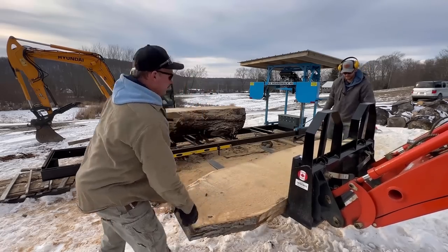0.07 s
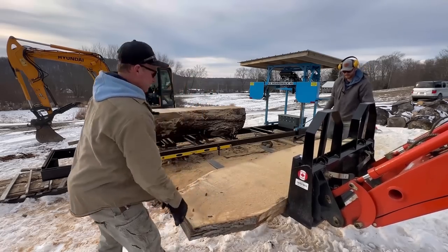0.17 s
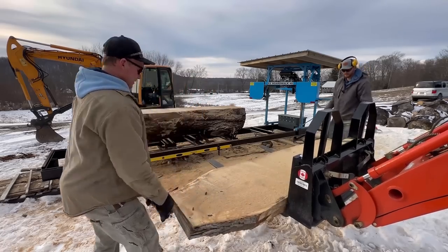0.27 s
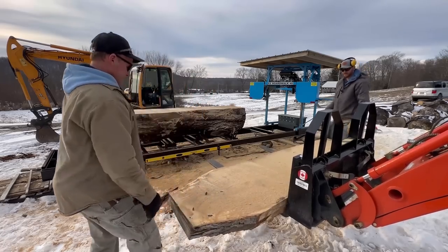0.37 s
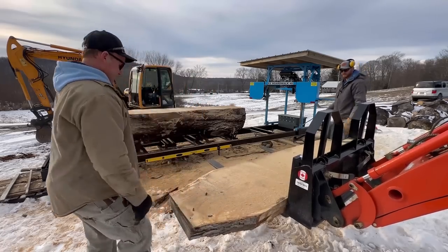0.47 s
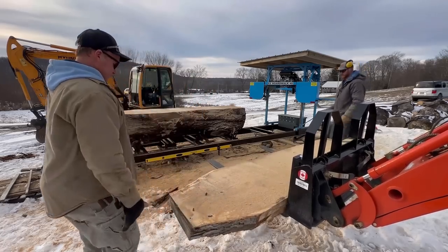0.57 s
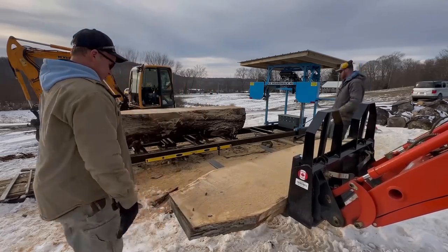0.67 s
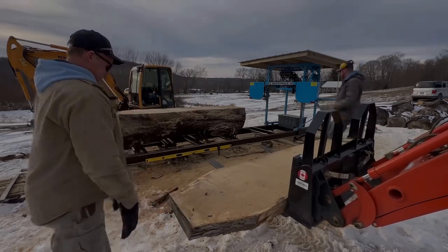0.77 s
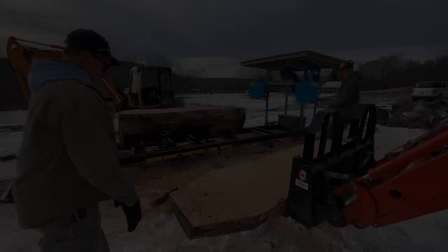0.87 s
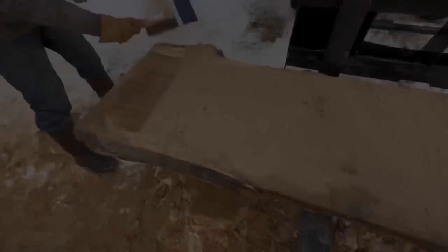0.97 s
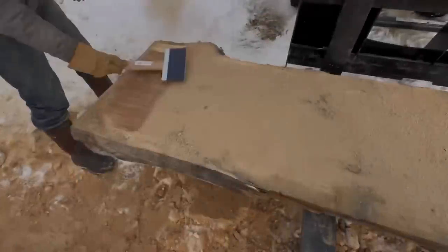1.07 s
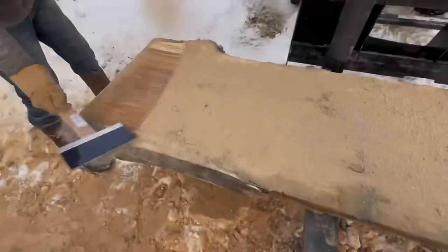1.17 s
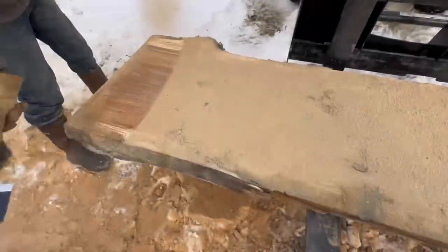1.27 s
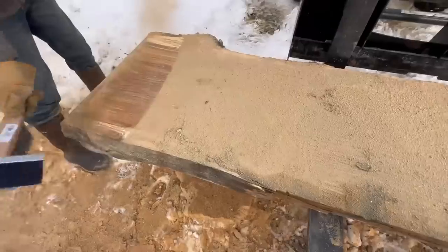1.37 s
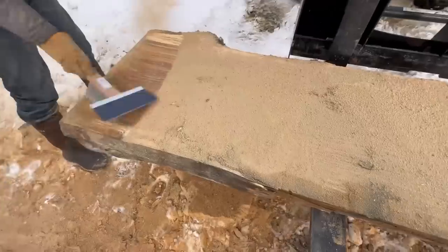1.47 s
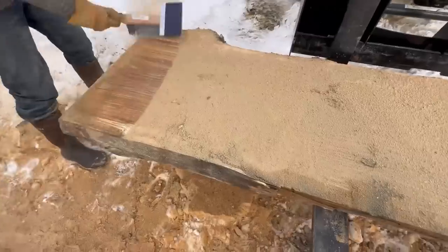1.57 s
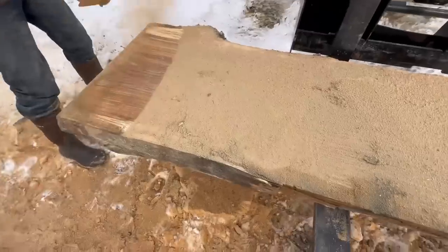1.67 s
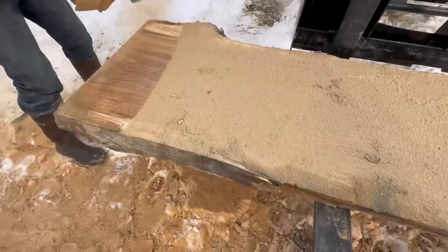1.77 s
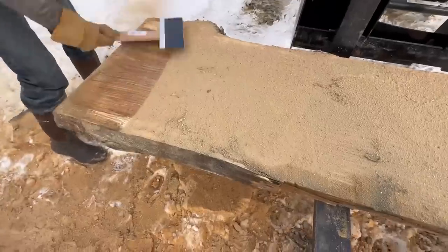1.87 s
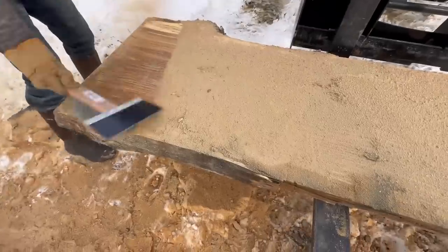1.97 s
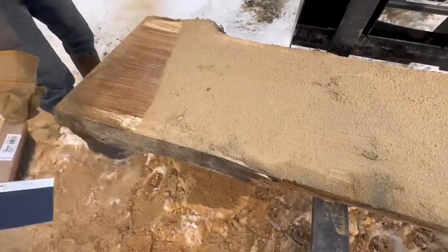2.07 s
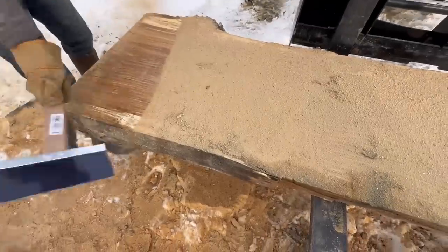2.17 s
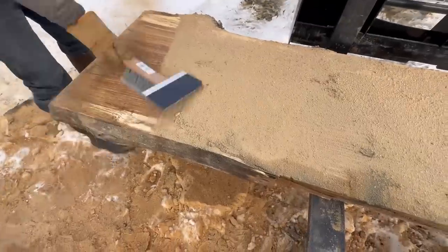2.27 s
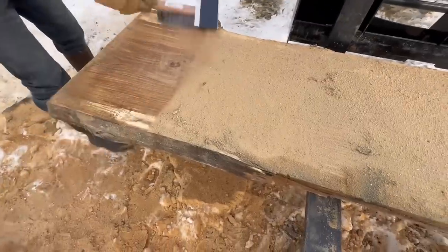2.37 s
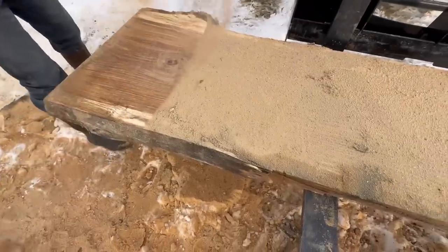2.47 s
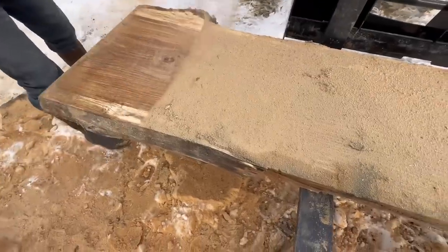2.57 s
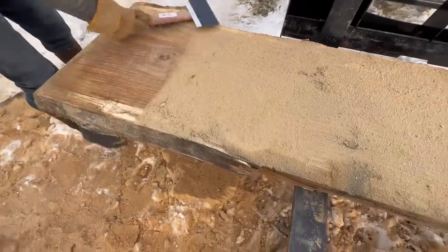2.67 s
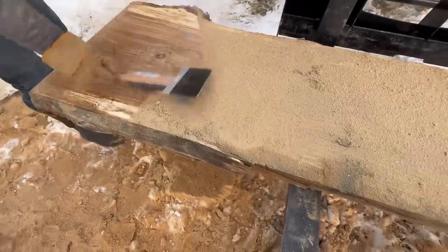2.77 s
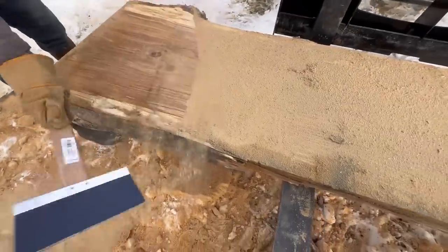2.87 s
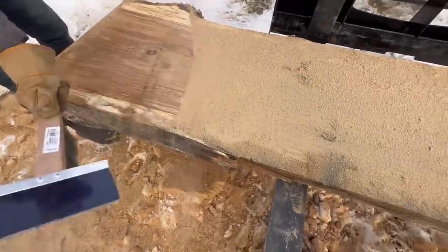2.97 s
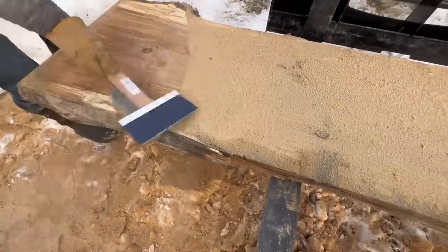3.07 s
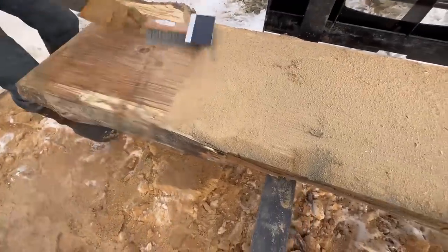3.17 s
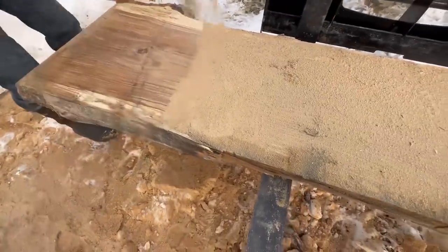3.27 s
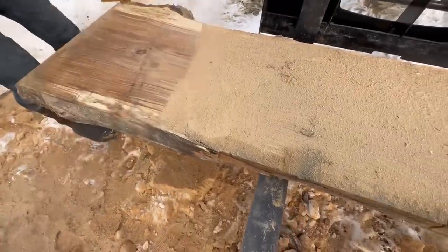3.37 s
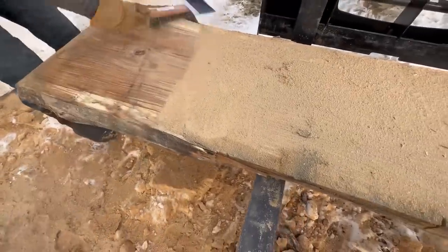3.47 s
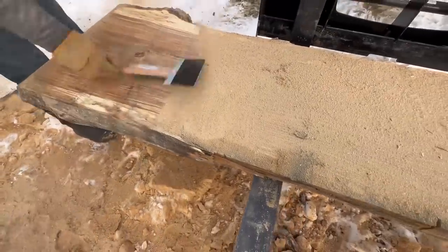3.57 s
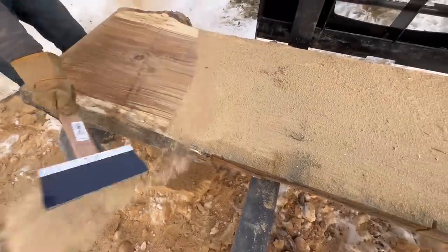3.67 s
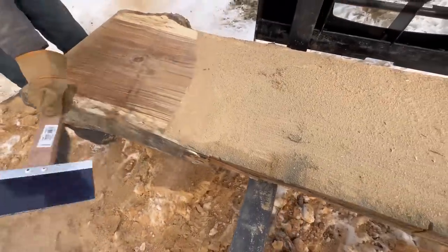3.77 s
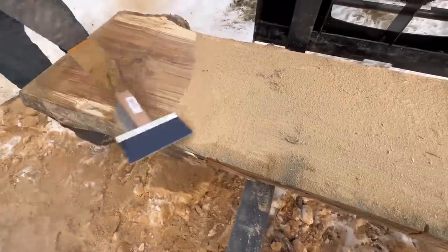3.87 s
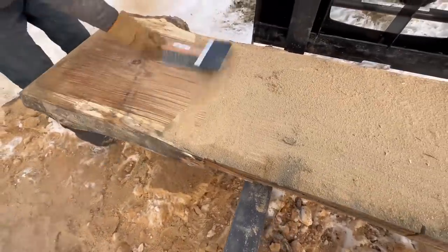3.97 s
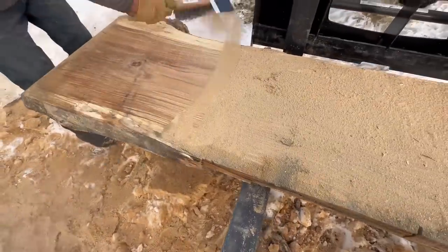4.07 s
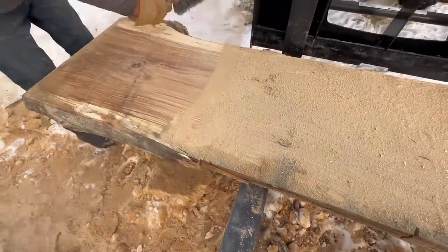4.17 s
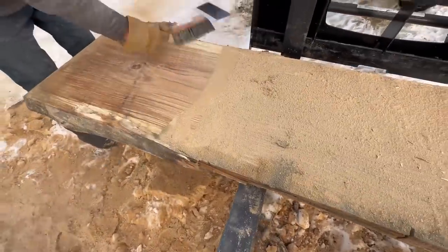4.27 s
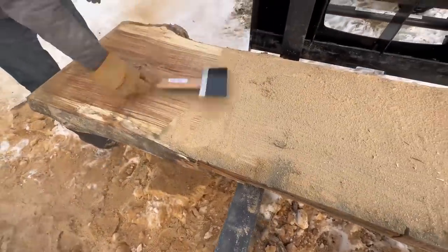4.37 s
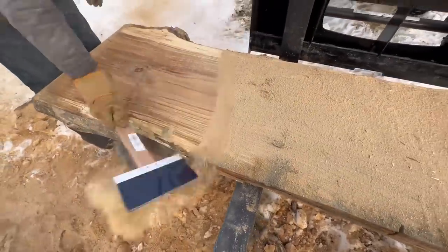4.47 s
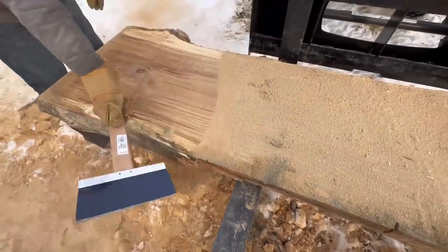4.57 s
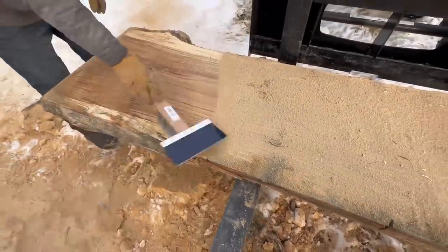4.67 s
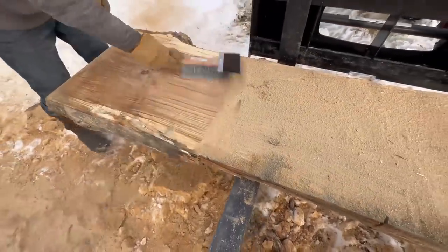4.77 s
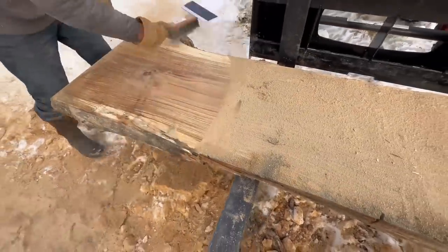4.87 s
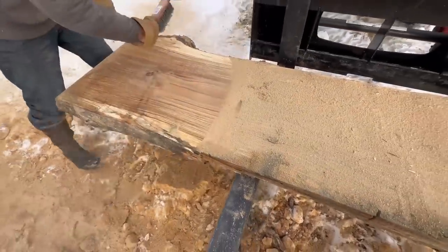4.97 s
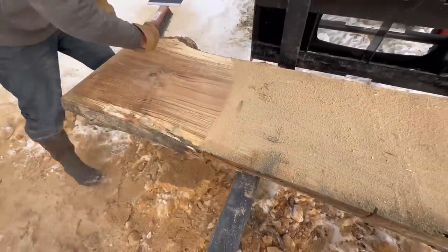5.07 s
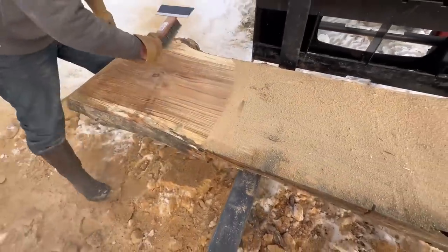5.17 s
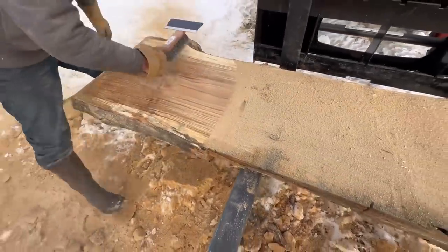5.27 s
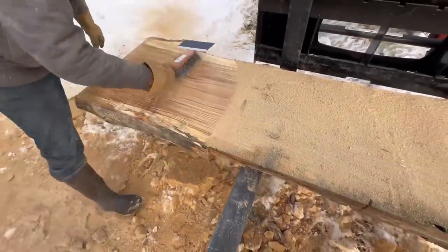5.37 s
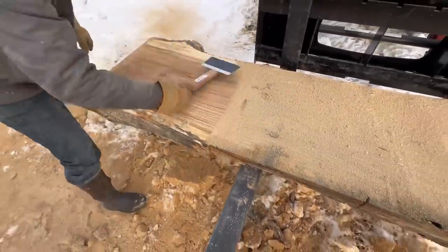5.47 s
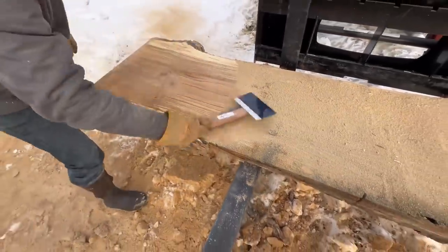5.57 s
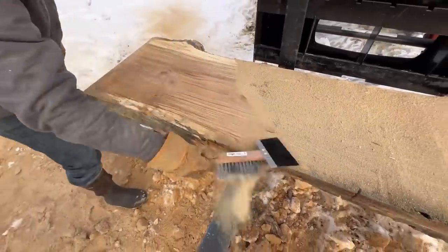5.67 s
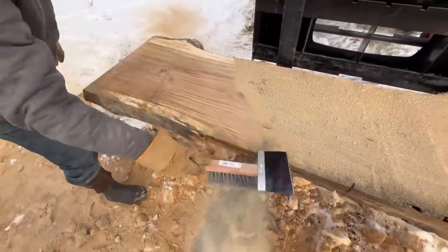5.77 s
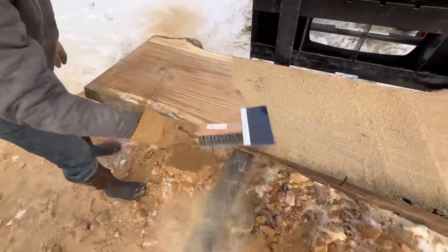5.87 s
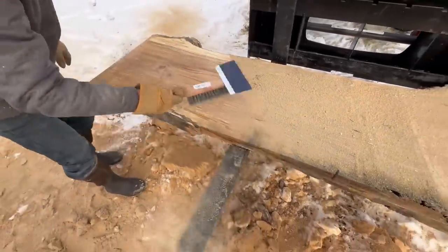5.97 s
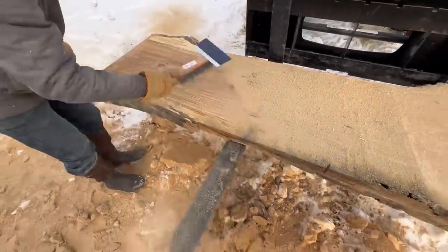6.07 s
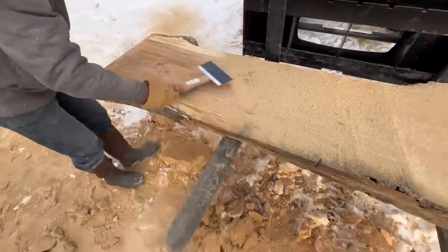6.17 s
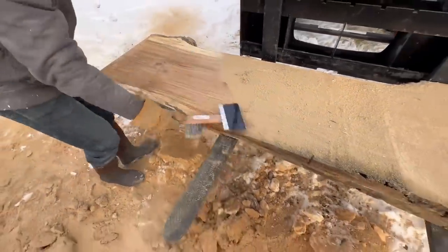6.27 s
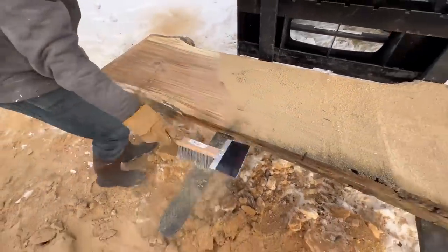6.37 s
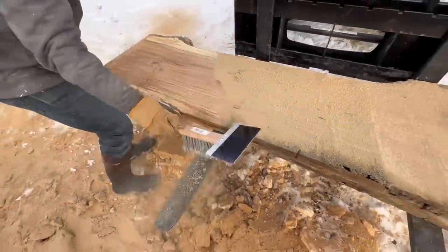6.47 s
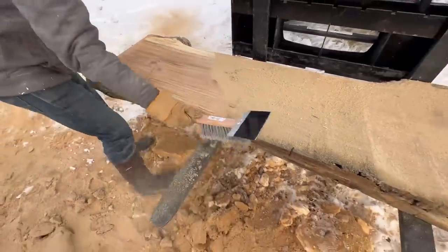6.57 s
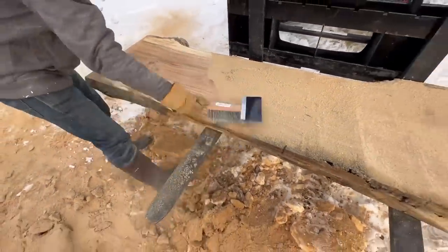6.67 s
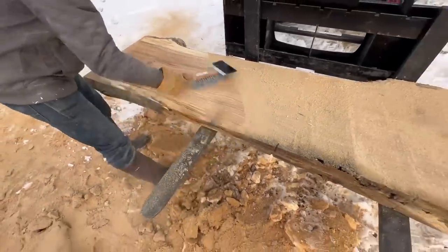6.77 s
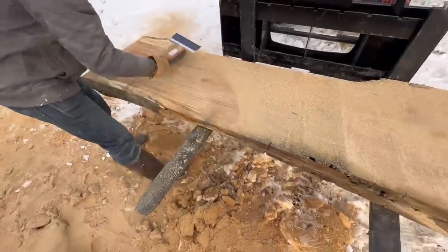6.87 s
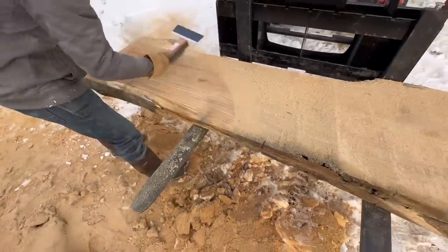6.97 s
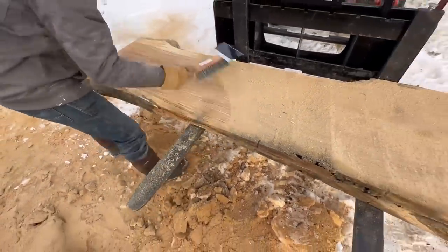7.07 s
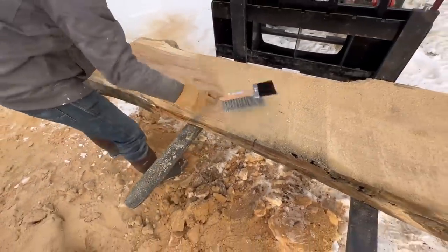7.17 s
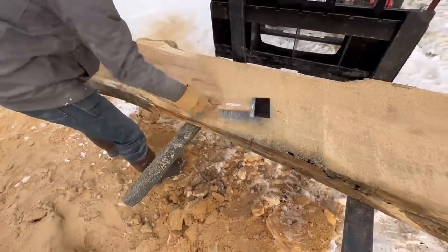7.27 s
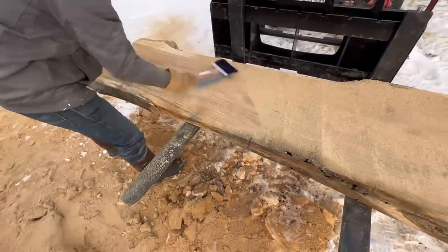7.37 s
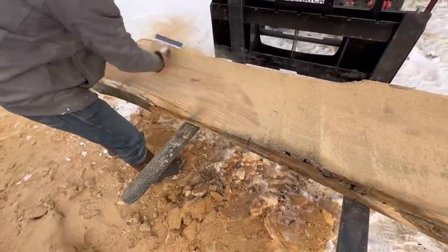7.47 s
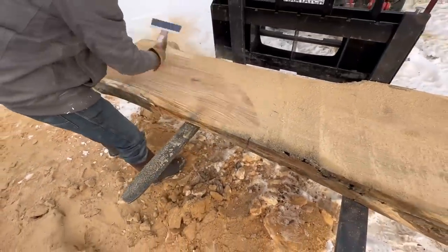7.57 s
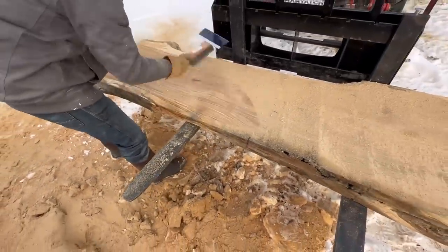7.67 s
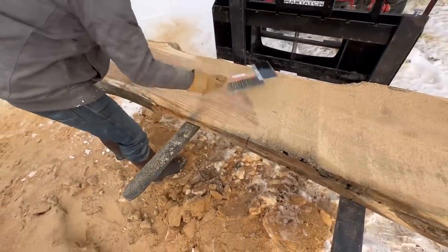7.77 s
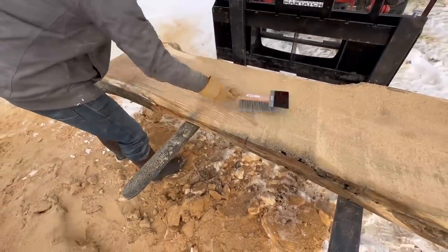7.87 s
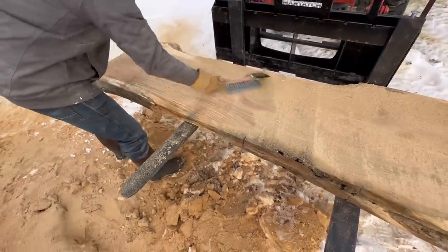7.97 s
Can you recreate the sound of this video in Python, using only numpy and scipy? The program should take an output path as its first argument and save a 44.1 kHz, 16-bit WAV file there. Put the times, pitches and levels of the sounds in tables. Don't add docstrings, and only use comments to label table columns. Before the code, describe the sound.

Outdoors, a loud slab impact and engine idle fade out, followed by brisk bristle strokes, soft woody thumps, metallic scraper clinks and wind rumble.

```python
import sys
import numpy as np
from scipy import signal
from scipy.fft import rfft, irfft
from scipy.io import wavfile
from scipy.ndimage import uniform_filter1d

SR = 44100
rng = np.random.default_rng(int(sys.argv[2]) if len(sys.argv) > 2 else 0)


def transcribe(u):
    v = np.clip(np.atleast_2d(u).T, -1, 1)
    q = np.round(v * 32767).astype(np.int16)
    wavfile.write(sys.argv[1], SR, q)


def ratio(d):
    e = np.asarray(d, float) / 20
    return 10 ** e


N = 353858
RING = SR // 4

FADE_OUT_S, SILENCE_S, FADE_IN_S = 0.54, 0.921, 1.42

# (frequency [Hz], level [dB])
ROAR_COLOUR = [(50, -18), (120, -7.5), (500, -8.5), (1000, -11), (2500, -20.5), (4100, -30), (6000, -23.5),
               (8600, -26.5), (9400, -34.5), (15500, -34)]
# (time [s], level [dB])
LOADER_LEVEL = [
    (0.0, -51.5),
    (0.594, -57),
    (0.93, -70.5),
]
# (frequency [Hz], width [Hz], level [dB])
HOUSING = [(2180, 200, -19), (3520, 320, -11.5)]
# (time [s], frequency [Hz], level [dB])
TURBO_PATH = [(0, 14600, -25), (.2, 14100, -23), (.34, 13900, -18), (.42, 13000, -17), (.46, 12900, -18),
              (.5, 12200, -30), (.58, 11800, -28), (.7, 12450, -23)]
# (frequency [Hz], level [dB])
PUMP_TONES = [(301.5, -5), (412, -3), (444, -5.5)]
# (time [s], pump hum [dB], valve hiss [dB], fan whine [dB])
ENGINE_LOAD = [(0, 6, -29, -10), (.2, 4.5, -22, -14), (.45, 3, -13, -14), (.6, -4, -8.5, -19),
               (.9, 3, -3, -17)]

# (frequency [Hz], level [dB per Hz])
WIND_COLOUR = [(8.8, -21), (15, -7), (38, 0), (135, -4.5), (216, -16.5), (326, -14.5), (400, -22),
               (520, -58), (880, -120)]
# (time [s], level [dB])
GUST_PEAKS = [(0.16, -52), (1.47, -50.5), (1.66, -51), (2.4, -47), (2.7, -55), (3.08, -58), (3.2, -47.5),
              (3.9, -53), (4.15, -53.5), (4.75, -47), (5.12, -48), (5.3, -49.5), (5.5, -38.5), (5.9, -49.5),
              (6.28, -43), (6.52, -49.5), (6.9, -48.5), (7.08, -51), (7.5, -52)]
BREEZE_DB, GUST_RISE_DB_PER_S, GUST_FALL_DB_PER_S = -62.5, 75, 70

# (time [s], peak [dB])
SLAB_LANDINGS = [
    (0.1218, -12.5),
    (0.1386, -23.5),
    (0.172, -30.5),
]
# (frequency [Hz], level [dB], time to fall 60 dB [s])
FORK_MODES = [(106, -13, 0.22), (156, -6.5, 0.22), (225.7, -0.5, 0.2), (282.5, 5, 0.14), (330, 5.5, 0.12),
              (400, -9, 0.082), (517, -6.5, 0.066), (644, -4, 0.042), (916, -17, .04)]

# (time [s], peak [dB], centre [Hz], fall [dB per 20 ms], brightness [dB])
SLAB_THUMPS = [(0.633, -42, 263, 7, -21), (1.359, -29, 254, 5.5, -4.5), (1.783, -26.5, 249, 5, -3.5),
               (2.242, -35, 242, 6, -3), (2.383, -44.5, 242, 15, -8), (2.714, -27, 288, 7.5, -11),
               (3.083, -30.5, 263, 6, -4), (3.166, -38.5, 246, 3, 1), (3.527, -33, 316, 5.5, -9),
               (3.92, -32.5, 318, 7, -7.5), (4.322, -26, 324, 6, -11), (4.708, -25, 331, 8.5, -6.5),
               (5.09, -28, 346, 5, -9.5), (5.481, -38, 203, 9, -2), (5.556, -40, 375, 6, -3),
               (6.137, -44, 260, 9, -16), (6.275, -49, 300, 26, -10), (6.487, -39, 234, 6, -15),
               (6.682, -41, 222, 3.5, -5), (7.69, -43.5, 277, 5.5, -6)]
# (frequency [Hz], level [dB])
SLAB_MODES = [(140, 4.5), (163, -2.5), (221, 0.5), (262, 0), (285, 0.5), (328, 7.5), (372, -3.5), (410, -2),
              (480, -2), (520, 3.5), (640, -5.5), (720, -14), (870, -11), (1050, -15)]
PAD_CYCLES, PAD_DB, REBOUND_S, REBOUND_DB = 1.96, 3.5, 0.01113, -5

# (time [s], peak [dB], length [ms], knock [dB])
TUFT_TICKS = [(0.691, -51, 7.3, -51), (1.121, -62, 2.1, -50.5), (1.4332, -43.5, 9, -45),
              (1.9325, -44, 4.2, -39), (2.1908, -59, 11, -48), (2.3162, -41.5, 4.9, -52),
              (2.7174, -56, 7.5, -38), (3.0627, -54, 1.7, -39), (3.1527, -59, 3.2, -44),
              (3.5442, -62, 2.3, -37), (3.784, -46, 2.1, -47), (4.3651, -64, 3.1, -39.5),
              (4.759, -53, 4.2, -45), (5.456, -50, 4.9, -36.5), (5.4886, -58, 4.4, -39.5),
              (5.8094, -64, 2.6, -68), (5.852, -61, 5.4, -41.5), (6.219, -58, 7.2, -42),
              (6.241, -43, 3.4, -35), (6.261, -54, 3.3, -37.5), (6.311, -60, 2.2, -53),
              (6.326, -60, 3.3, -46), (6.758, -64, 5.2, -43), (7.028, -53, 1.4, -43.5),
              (7.061, -65, 3.6, -51), (7.339, -53, 4, -44.5), (7.753, -64, 2.1, -45.5),
              (7.918, -67, 2.1, -45), (7.966, -49, 4.5, -48)]

# (frequency [Hz], level [dB per Hz])
YARD_COLOUR = [(59, -10.5), (100, -13), (519, -16.5), (774, -16.5), (1160, -23.5), (1550, -28.5),
               (2320, -33), (2930, -34.5), (4370, -35.5), (15500, -40.5)]
# (time [s], level [dB])
YARD_LEVEL = [(1.0, -60.5), (1.5, -58.5), (2.35, -59), (3.7, -61.5), (5.1, -63), (5.67, -57.5),
              (5.9, -60.5), (7.26, -63), (8.02, -59.5)]

# (landing [s], speeding up [ms], time down [ms], hiss [dB], landing below it [dB])
PRESSED_STROKES = [(1.124, 100, 150, -52, 10), (1.543, 240, 130, -44, 14), (1.938, 117, 149, -48.5, 3.5),
                   (2.318, 126, 180, -50, 4.5), (2.726, 124, 194, -48.5, 4), (3.162, 114, 172, -49, 5.5),
                   (3.554, 160, 176, -48, 4), (3.964, 166, 162, -50, 4), (4.371, 76, 175, -45, 8.5),
                   (4.763, 110, 147, -47, 12.5), (5.455, 180, 366, -48, 7), (6.238, 85, 196, -47.5, 10.5),
                   (6.759, 200, 175, -51, 8.5), (7.343, 128, 200, -47, 13)]
# (landing [s], speeding up [ms], time down [ms], hiss [dB], landing below it [dB])
LIGHT_DRAGS = [(1.289, 170, 194, -63, 6.2), (1.84, 80, 70, -67.5, 6), (2.13, 56, 74, -63.5, 12),
               (2.23, 76, 91, -71, 3), (2.51, 18, 65, -63, 0.33), (2.6, 100, 130, -69, 6.3),
               (2.93, 10, 12, -68, 1), (3.08, 70, 84, -68, 8), (3.35, 270, 250, -67, 1.4),
               (4.15, 30, 280, -66, 0.33), (5.098, 200, 180, -73, 8), (5.29, 46, 160, -61, 5.3),
               (5.86, 46, 104, -65.5, 2.9), (6.55, 20, 280, -74, 4.3), (7.0, 36, 335, -79, 2),
               (7.64, 210, 290, -59.5, 10.7), (7.951, 61, 120, -61, 11), (3.745, 7.3, 9.4, -64, 4)]
# (frequency [Hz], level [dB per Hz])
BRISTLE_COLOUR = [(300, -71), (520, -20.5), (1030, -2), (1670, -13.5), (2900, -11), (4200, -11.5),
                  (5700, -6), (6950, -0.5), (8300, -6), (9400, -17), (10700, -13), (11600, -15.5),
                  (13600, -7.5), (15600, -10)]
LAND_S, SLOWING_DB_PER_S, LIFT_S = 0.018, 69, 0.017
TOUCH_DB = -21
DUST_DB, SETTLE_DB_PER_S = -16, 250
TIPS_DB, FLICK_DB, FLICK_S = -1.5, 3, 0.034

# (frequency [Hz], width [Hz], level [dB])
BLADE_BANDS = [(4640, 130, 0.5), (10700, 220, 1), (13900, 300, 3)]
# (start [s], end [s], low band [dB], middle band [dB], high band [dB])
BLADE_TRAILS = [(1.282, 1.53, -78, -78, -73), (3.108, 3.22, -90, -68, -84), (3.36, 3.5, -92, -78, -88),
                (5.233, 5.453, -81, -78, -90), (5.297, 5.46, -90, -90, -70), (7.74, 7.948, -76, -85, -82)]
# (time [s], frequency [Hz], level [dB])
SQUEAK_PATH = [(5.21, 8600, -100), (5.235, 10400, -74), (5.27, 12700, -75), (5.3, 15200, -71),
               (5.345, 15000, -80), (5.375, 14000, -71), (5.39, 13900, -100)]

# (time [s], peak [dB], pitch [Hz], cycles to the peak)
HANDLE_KNOCKS = [(2.414, -49, 152, 0.25), (2.617, -43, 150.4, 0.68), (3.073, -34.5, 217, 0.54),
                 (3.198, -31, 131, 0.64), (4.745, -31.5, 285, 1.04), (5.311, -39, 150, .8),
                 (5.426, -36, 150, 0.89), (1.415, -44, 282, 1.7), (1.84, -42, 280, 1.4),
                 (2.333, -41, 300, 1.2), (5.125, -43.5, 324, 1.9), (6.542, -44, 202, 0.5),
                 (6.568, -46, 160, .6), (5.508, -29, 150, 0.85), (5.76, -40.5, 338, 1),
                 (6.2178, -45, 231, 0.5), (6.247, -33, 382, 0.97), (6.2631, -23, 325, 0.95),
                 (6.2715, -28.5, 354, 0.64), (6.295, -48, 233, 0.65), (6.31, -34, 264, 0.58),
                 (6.3212, -26, 344, 0.94), (6.344, -37, 328, 0.58), (6.36, -34, 278, 0.48),
                 (7.0581, -28.5, 272, 0.27), (7.073, -36.5, 410, 0.46), (7.126, -54, 110, .4),
                 (7.2, -46, 130, 0.32), (7.531, -41, 507, 0.7)]

# (time [s], peak [dB], pitch [Hz], length [ms])
HANDLE_RAPS = [(3.547, -53, 2800, 1.6), (3.549, -37, 1070, 3.2), (3.557, -47, 1270, 4.3),
               (3.848, -57, 1400, 2.7), (3.852, -69, 2500, 2), (3.949, -50.5, 1300, 2.8),
               (3.089, -43, 640, 1.68), (6.417, -40, 1940, 4.3), (6.418, -37.5, 2760, 4.2),
               (6.263, -40, 1180, 2), (1.785, -45.5, 640, 4), (5.093, -42, 660, 4.6), (3.98, -41, 480, 2.3),
               (4.744, -45, 700, 4), (4.798, -43, 310, 10), (6.66, -61, 2100, 3), (6.66, -61, 3000, 3),
               (7.059, -48, 860, 2.7)]

# (start [s], end [s], level [dB], thin rasp on top [dB])
BACK_SCRAPES = [(2.298, 2.356, -52, -18), (2.42, 2.573, -62, 2), (3.16, 3.245, -55, -2.5),
                (4.708, 4.81, -56, -21), (5.087, 5.408, -67, -3), (5.405, 5.627, -57, -11),
                (6.2, 6.385, -56, -10), (6.76, 6.93, -60.5, -1), (7.024, 7.098, -53.5, -22),
                (7.485, 7.598, -62, -1), (7.73, 7.957, -62.5, -21)]
# (frequency [Hz], width [Hz], level [dB])
GRIT_BANDS = [(750, 210, -2.5), (1160, 350, -4.5)]
# (frequency [Hz], width [Hz], level [dB])
RASP_BANDS = [(1680, 1400, -2), (2560, 2800, -4)]

# (time [s], peak [dB], scrape length [ms], blade ring [dB], handle [dB])
EDGE_CATCHES = [
    (4.7975, -12.5, 4.98, -2.5, -14),
    (4.808, -10.5, 3.61, -8.5, -19),
]
# (time [s], peak [dB], scrape length [ms], blade ring [dB], handle [dB])
HEEL_CATCHES = [
    (3.9815, -15, 3.3, -29, -18),
    (3.9926, -17.5, 3.8, -10.5, -10),
]
# (time [s], peak [dB], scrape length [ms], blade ring [dB], handle [dB])
CORNER_CATCHES = [
    (6.4158, -23.5, 4, -1, -11),
    (6.4205, -28, 4.1, -10.5, -17),
]
# (frequency [Hz], level [dB], time to fall 60 dB [s])
BLADE_MODES = [(1390, -16, 0.12), (2670, -15, 0.25), (3278, -10, 0.27), (3871, 2, .06), (3930, -9, 0.15),
               (4613, -5, 0.06), (5373, -4, 0.22), (6105, -7, 0.28), (6196, -1, 0.16), (6950, 2, .06),
               (7063, -3, 0.14), (7600, 0, 0.11), (7850, 6, 0.05), (12250, -10, .05)]
# (frequency [Hz], level [dB], time to fall 60 dB [s])
HEEL_MODES = [(1362, -9, .13), (2697, -16, .18), (3262, -8, .26), (3924, -10, .13), (4667, -9, .13),
              (4953, -16, .12), (5373, -5, .18), (5868, -12, .15), (6185, -3, .18), (7052, -8, .18),
              (7300, 3, .04), (7973, -10, .25), (12250, -10, .05)]
# (frequency [Hz], level [dB], time to fall 60 dB [s])
CORNER_MODES = [(1351, -10, 0.1), (1707, -21, 0.24), (2153, -23, 0.42), (2165, -24, 0.42), (2350, -5, 0.03),
                (4398, -8, .043), (4592, -21, 0.2), (5329, -16, 0.22), (6202, -10, .11), (6700, -4, .05),
                (7040, -11, 0.17), (7700, -9, 0.07), (12140, -15, 0.1), (12900, -15, 0.08)]
# (frequency [Hz], level [dB], time to fall 60 dB [s])
HANDLE_MODES = [(767, -6, 0.032), (844, -4.5, 0.1), (980, 0.5, 0.085), (1057, -5.5, 0.048),
                (1140, -16, 0.18), (1560, -19, 0.024)]
# (frequency [Hz], level [dB], time to fall 60 dB [s])
GRIP_MODES = [(800, -6, 0.057), (960, 3, 0.13), (1124, -4, 0.069), (1372, -21, 0.31), (1630, -6, .05),
              (2060, -8, 0.051)]
# (frequency [Hz], level [dB per Hz])
EDGE_COLOUR = [(350, -8.5), (600, -16), (966, -5.5), (1860, -12.5), (3770, -1), (4370, -1), (6310, 4.5),
               (9500, -10.5), (15500, -1)]
MINOR_DB, MINOR_T60_S = -9, .08


def noise():
    return rng.standard_normal(N)


def curve(table):
    s, *columns = np.transpose(sorted(map(tuple, table)))
    return [np.interp(np.arange(N) / SR, s, column) for column in columns]


def colour(x, spectrum, lo_hz=0., hi_hz=SR):
    hz, db = np.transpose(spectrum)
    f = np.arange(len(x) // 2 + 1) * SR / len(x)
    shaped = rfft(x) * ratio(np.interp(np.log(f + 1), np.log(hz), db))
    inside = shaped[(f >= lo_hz) & (f <= hi_hz)]
    return irfft(shaped, len(x)) * len(x) / np.sqrt(2 * np.sum(abs(inside) ** 2))


def split(x, lo_hz, hi_hz):
    low = signal.sosfiltfilt(signal.butter(2, lo_hz, fs=SR, output="sos"), x)
    high = signal.sosfiltfilt(signal.butter(4, hi_hz, "high", fs=SR, output="sos"), x)
    return low, x - low - high, high


def resonances(x, peaks):
    out = 0
    for hz, width, db in peaks:
        rung = signal.lfilter(*signal.iirpeak(hz, hz / width, fs=SR), x)
        out = out + ratio(db) * rung / rung.std()
    return out


def walk(rate, size=N):
    k = int(SR / rate)
    held = np.repeat(rng.standard_normal(size // k + 1), k)
    return 1.3 * uniform_filter1d(uniform_filter1d(held, k), k)[:size]


def whistle(table, waver_hz):
    hz, db = curve(table)
    phase = 2 * np.pi * np.cumsum(hz + waver_hz * walk(80)) / SR
    return ratio(db + 5.5 * walk(60)) * np.sin(phase)


def swell(ms):
    return 1 - np.exp(-np.arange(RING) / SR * 1000 / max(ms, .2))


def ring(hz, db, t60, turn=0, together=False):
    t = np.arange(RING)[:, None] / SR
    sign = -1 if together else (-1) ** np.arange(len(hz))
    decay = np.exp(-np.log(1000) * t / t60)
    return (sign * ratio(db) * decay * np.sin(2 * np.pi * hz * t + turn)).sum(axis=1)


def burst(ms):
    u = np.arange(SR // 20) / SR * 1000 / max(ms, 1)
    return u ** 1.29 * np.exp(1 - 1.13 * u) * rng.standard_normal(SR // 20)


def add(track, s, sound, peak_db):
    i = int(s * SR)
    track[i:i + len(sound)] += (sound * ratio(peak_db) / abs(sound).max())[:N - i]


def fade():
    return np.interp(np.arange(N) / SR, [FADE_OUT_S, SILENCE_S, FADE_IN_S], [1, 0, 1])


def loader():
    hum_db, valve_db, whine_db = curve(ENGINE_LOAD)
    roar = ratio(.8 * walk(15)) * colour(noise(), ROAR_COLOUR, lo_hz=600., hi_hz=9000.)
    hum = 0
    for hz, db in PUMP_TONES:
        phase = 2 * np.pi * np.cumsum(hz + 8 * walk(30)) / SR
        hum = hum + ratio(db + 3 * walk(25)) * np.sin(phase)
    housing = sum(resonances(noise(), [band]) * ratio(3 * walk(14)) for band in HOUSING)
    whine = ratio(whine_db) * resonances(noise(), [(4580, 230, 0.003)])
    valve = ratio(valve_db) * resonances(noise(), [(1655, 120, 0)])
    engine = roar + housing + whine + ratio(hum_db) * hum + valve + whistle(TURBO_PATH, waver_hz=90)
    return ratio(curve(LOADER_LEVEL)[0]) * engine * (np.arange(N) < SILENCE_S * SR)


def wind():
    t = np.arange(0, N / SR, .01)
    power = ratio(2 * BREEZE_DB)
    for s, db in GUST_PEAKS:
        drop_db = np.maximum(GUST_RISE_DB_PER_S * (s - t), GUST_FALL_DB_PER_S * (t - s))
        power = power + ratio(2 * (db - drop_db))
    strength = curve(np.transpose([t, np.sqrt(power)]))[0]
    eddies = noise() * ratio(2 * walk(18))
    return fade() * strength * colour(eddies, WIND_COLOUR, lo_hz=12.0, hi_hz=126.0)


def slab_drop():
    out = np.zeros(N)
    for s, peak_db in SLAB_LANDINGS:
        rung = ring(*np.transpose(FORK_MODES), together=True)
        add(out, s, swell(ms=1.17) ** 2 * rung, peak_db)
    return out


def thumps():
    out = np.zeros(N)
    hz, db = np.transpose(SLAB_MODES)
    for s, peak_db, centre, fall_db, bright_db in SLAB_THUMPS:
        chance_db = 2.2 * rng.standard_normal(len(hz))
        spot_db = np.maximum(-38 * np.log2(hz / centre) ** 2, bright_db) + chance_db
        t60 = 1.2 / max(fall_db, 1) * (280 / hz) ** 0.64
        blow = swell(ms=2.53) ** 3 * ring(hz, db + spot_db, t60, together=True)
        lag = int(0.0105 * SR)
        blow[lag:] += ratio(-9.0) * blow[:-lag]
        u = np.arange(RING) / SR * centre / PAD_CYCLES
        pad = u ** 3 * np.exp(3 - 3 * u) * np.sin(2 * np.pi * PAD_CYCLES * u)
        lag = int(REBOUND_S * SR)
        pad[lag:] += ratio(REBOUND_DB) * pad[:-lag]
        add(out, s - .0032, blow / abs(blow).max() + ratio(PAD_DB) * pad, peak_db)
    return out


def ticks():
    out = np.zeros(N)
    for s, peak_db, ms, knock_db in TUFT_TICKS:
        puff = burst(ms)
        add(out, s - .001, split(colour(puff, BRISTLE_COLOUR), 2100, 12000)[1], peak_db)
        add(out, s - .001, resonances(puff, [(905, 180, 1.9), (642, 330, 3.0)]), knock_db)
    return out


def yard():
    air = colour(noise(), YARD_COLOUR, lo_hz=390.0, hi_hz=1470.0)
    low, middle, high = split(air, 350, 2130)
    moving = low * ratio(1.1 * walk(8.5))
    for part in split(middle, 780, 1040):
        moving = moving + part * ratio(3.8 * walk(22))
    started = np.arange(N) > SILENCE_S * SR
    return fade() * (ratio(curve(YARD_LEVEL)[0]) * moving + ratio(-61.5) * high) * started


def pressure():
    t = np.arange(0, N / SR, .001)
    power, flick = 1e-12, 0
    for land, rise_ms, down_ms, db, soft_db in PRESSED_STROKES + LIGHT_DRAGS:
        fast, lift = land + min(rise_ms, down_ms) / 1000, land + down_ms / 1000
        end_db = db - SLOWING_DB_PER_S * (lift - fast)
        land_db, dust_db = db - soft_db, end_db + DUST_DB
        gone = lift + LIFT_S
        times = [land - 2 * LAND_S, land - LAND_S, land, fast, lift, gone, gone + 1]
        levels = [-120, land_db + TOUCH_DB, land_db, db, end_db, dust_db, dust_db - SETTLE_DB_PER_S]
        stroke = ratio(2 * np.interp(t, times, levels))
        power = power + stroke
        flick = flick + stroke * np.exp(-np.maximum(lift - t, 0) / FLICK_S)
    return curve(np.transpose([t, 10 * np.log10(power), flick / power]))


def patchy(x, patchy_db):
    z = signal.stft(x, nperseg=512)[2]
    field = uniform_filter1d(rng.standard_normal(z.shape), size=4, axis=0)
    field = uniform_filter1d(field, size=5, axis=1)
    return signal.istft(z * ratio(patchy_db * field / field.std()), nperseg=512)[1][:N]


def brush():
    hiss_db, flick = pressure()
    slips = noise() * ratio(0.8 * np.minimum(rng.exponential(size=N), 5))
    hiss = colour(patchy(slips, 2.6), BRISTLE_COLOUR, lo_hz=3830.0, hi_hz=9300.0)
    low, middle, high = split(hiss, 2900, 9700)
    chips = (rng.random(N) < 250 / SR) * noise()
    low = low * ratio(1.6 * walk(40))
    low = low + resonances(chips, [(794, 300, -25.5), (1260, 2300, -19.0)])
    low = low * ratio(np.clip(-.6 * (hiss_db + 54.5), -8, 7))
    high = high * ratio(TIPS_DB + FLICK_DB * flick + 0.23 * walk(33))
    middle = middle * ratio(1.4 * walk(32))
    started = np.arange(N) > SILENCE_S * SR
    return started * ratio(hiss_db + 1.2 * walk(45)) * (low + middle + high)


def trailing():
    t = np.arange(N) / SR
    out = whistle(SQUEAK_PATH, waver_hz=260)
    for k, band in enumerate(BLADE_BANDS):
        touch = 0
        for start, end, *levels in BLADE_TRAILS:
            span = np.interp(t, [start, start + .03, end - .02, end], [0, 1, 1, 0])
            touch = touch + ratio(levels[k]) * span
        out = out + touch * resonances(noise(), [band]) * ratio(2.5 * walk(30))
    return out


def knocks():
    out = np.zeros(N)
    slab = ring(*np.transpose(SLAB_MODES), 0.031)
    soft_ring = swell(ms=1.9) * ratio(-12) * slab / abs(slab).max()
    t = np.arange(RING) / SR
    for s, peak_db, pitch, cycles in HANDLE_KNOCKS:
        u = t * pitch / max(cycles, .2)
        tone = np.sin(2 * np.pi * pitch * t) + ratio(-22.5) * np.sin(2 * np.pi * 2.16 * pitch * t)
        add(out, s, u ** 2 * np.exp(2 - 2 * u) * tone + soft_ring, peak_db)
    return out


def raps():
    out = np.zeros(N)
    for s, peak_db, hz, ms in HANDLE_RAPS:
        add(out, s - .001, resonances(burst(ms), [(hz, hz / 12.0, 0)]), peak_db)
    return out


def scrapes():
    t = np.arange(N) / SR
    touch, thin = 0, 0
    for start, end, db, rasp_db in BACK_SCRAPES:
        span = np.interp(t, [start, start + 0.03, end - .02, end], [0, 1, 1, 0])
        touch = touch + ratio(db) * span
        thin = thin + ratio(db + rasp_db) * span
    grit = (rng.random(N) < 600 / SR) * noise() * ratio(4 * walk(50))
    rasp = noise() * ratio(3 * walk(60))
    crackle = split(resonances(grit, GRIT_BANDS), 300, 1380)[1]
    return touch * crackle + thin * split(resonances(rasp, RASP_BANDS), 1330, 3800)[1]


def clangs(catches, blade, chatter_db, handle=HANDLE_MODES):
    out = np.zeros(N)
    for s, peak_db, ms, ring_db, handle_db in catches:
        hz, db = rng.uniform(2300, 9000, size=24), rng.normal(0, 4, size=24)
        minor = swell(ms) * ring(hz, db, rng.uniform(.4, 1.6, size=24) * MINOR_T60_S)
        body = ratio(ring_db + MINOR_DB) * minor / abs(minor).max()
        for modes, body_db in ((blade, ring_db), (handle, handle_db)):
            hz, db, t60 = np.transpose(modes)
            flutter = np.transpose([walk(110, size=RING) for _ in hz])
            waver = np.transpose([walk(110, size=RING) for _ in hz])
            rung = swell(ms) * ring(hz, db + chatter_db * flutter, t60, turn=.2 * chatter_db * waver)
            body = body + ratio(body_db) * rung / abs(rung).max()
        edge = colour(np.pad(burst(ms), (0, RING - SR // 20)), EDGE_COLOUR)
        i = int(s * SR)
        out[i:i + RING] *= 1 - .85 * swell(ms)
        add(out, s - ms / 3000, edge / abs(edge).max() + body, peak_db)
    return out


def scene():
    dip = np.clip(abs(np.arange(N) / SR - SILENCE_S) / 0.045, 0, 1)
    background = dip * (loader() + wind() + yard())
    hits = slab_drop() + thumps() + ticks() + knocks() + raps() + scrapes()
    hits = hits + clangs(HEEL_CATCHES, HEEL_MODES, 4.5, GRIP_MODES)
    hits = hits + clangs(EDGE_CATCHES, BLADE_MODES, 4.5) + clangs(CORNER_CATCHES, CORNER_MODES, 2.2)
    return (background + hits + brush() + trailing())[None]


def band_limit(x):
    return signal.sosfilt(signal.butter(12, 16810, fs=SR, output="sos"), x)


def record(dry):
    top_cut = signal.ellip(10, .2, 70, 15600, fs=SR, output="sos")
    dull = signal.sosfilt(top_cut, dry)
    return band_limit(dull)


dry = scene()
out = record(dry)
transcribe(out)
```